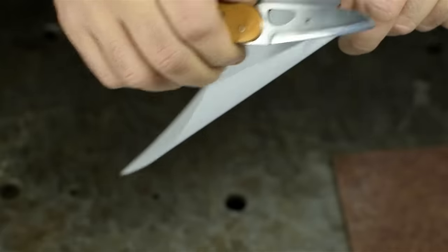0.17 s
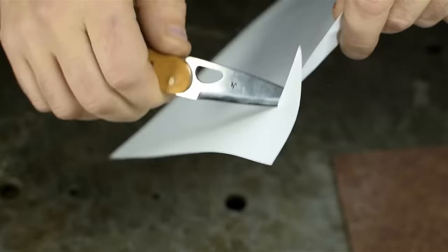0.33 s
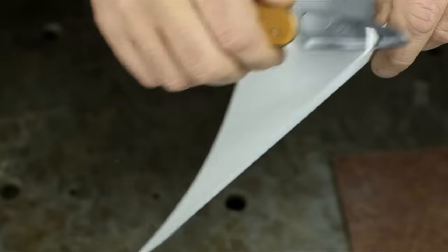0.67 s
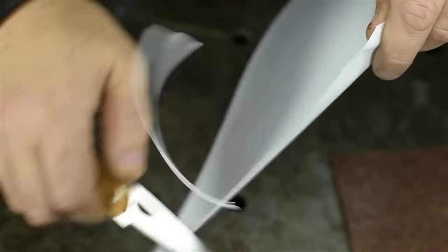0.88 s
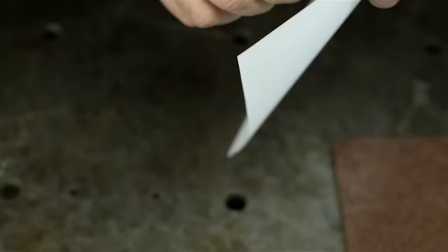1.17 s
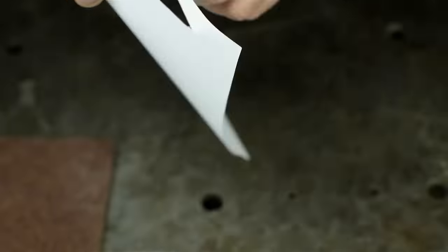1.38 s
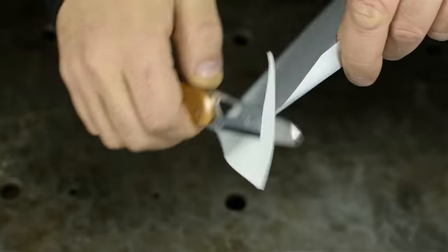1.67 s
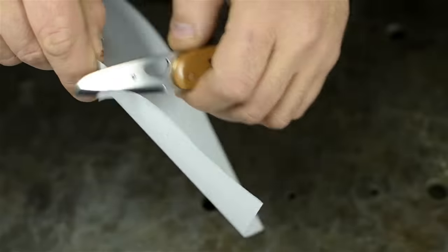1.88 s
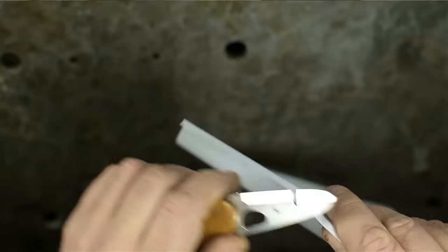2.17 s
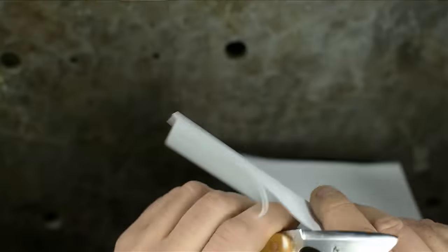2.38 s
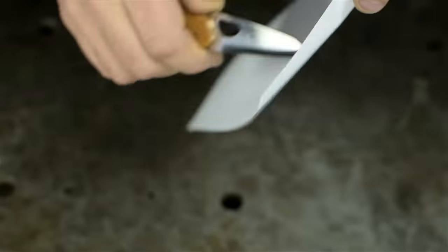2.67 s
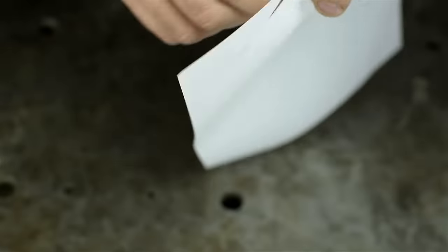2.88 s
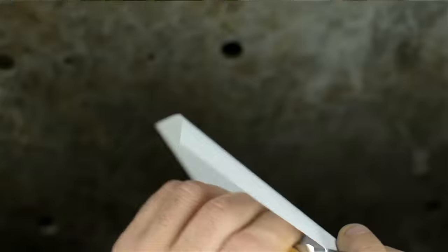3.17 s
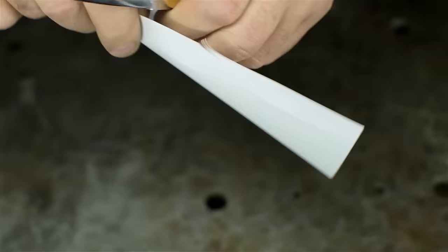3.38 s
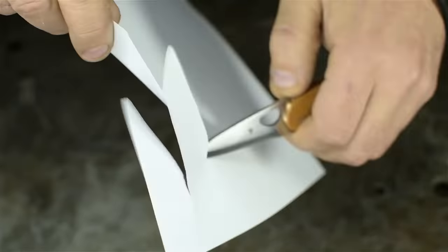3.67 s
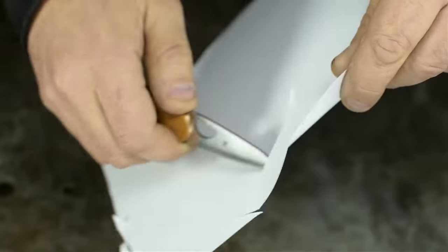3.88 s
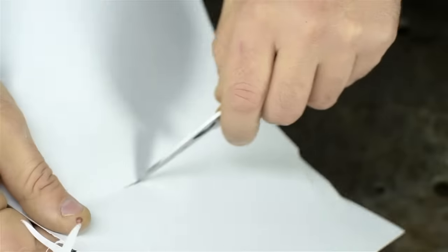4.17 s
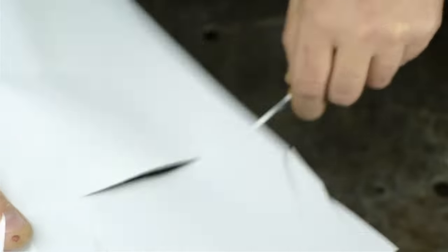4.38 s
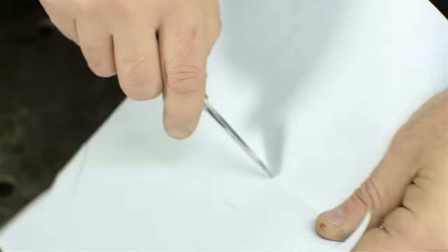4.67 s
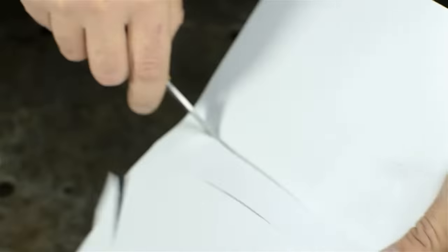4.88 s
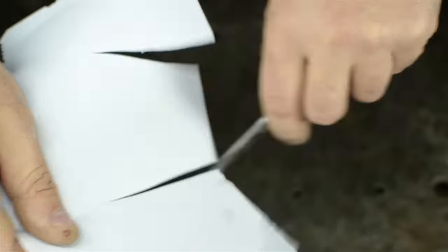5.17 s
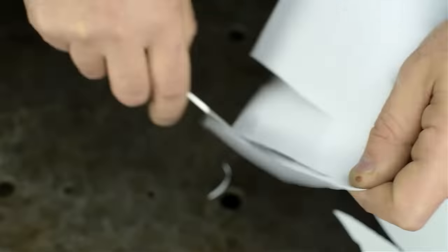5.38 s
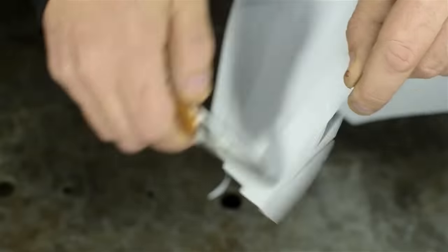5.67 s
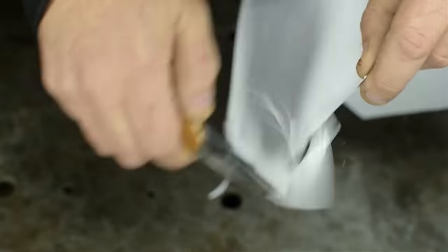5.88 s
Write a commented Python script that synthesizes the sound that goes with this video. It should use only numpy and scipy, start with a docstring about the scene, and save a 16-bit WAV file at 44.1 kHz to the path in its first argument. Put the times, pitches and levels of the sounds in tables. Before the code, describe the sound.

A sharp knife cuts a hand-held sheet of paper in quick, crisp, hissing strokes. A few longer slices come first, then a fast run of shavings and nicks, several slits through the sheet, and some tiny cuts at the end. The paper crackles, rustles and flexes between strokes, with an occasional slight squeak. The microphone is close, in a small, dry, quiet workshop.

```python
"""A sharp knife shaves strips off a hand-held sheet of paper and slits it, close up, over a workbench.
The edge snaps fibres in a dense, uneven stream; the sheet radiates them, coloured by how it is held.
The paper crackles as it buckles, a curling strip squeaks now and then, and the loose sheet drums.
A small, dry workshop answers faintly over quiet room tone."""
import sys
import numpy as np
from scipy import signal
from scipy.fft import rfft, irfft, next_fast_len
from scipy.io import wavfile
from scipy.ndimage import uniform_filter1d

SR = 44100
rng = np.random.default_rng(int(sys.argv[2]) if len(sys.argv) > 2 else 0)


def file_out(sig):
    """Save sig as 16-bit WAV at sys.argv[1]."""
    # one column per channel
    cols = np.atleast_2d(sig).T
    # limit, then scale
    lim = np.clip(cols, -1, 1)
    pcm = np.round(lim * 32767).astype(np.int16)
    wavfile.write(sys.argv[1], SR, pcm)


N = 266319
T = np.arange(N) / SR


def undb(db):
    """Decibels to gain."""
    return np.exp(np.asarray(db) * np.log(10) / 20)


def unit(x):
    """Scale to rms 1."""
    return x / np.sqrt(np.mean(x ** 2) + 1e-18)


def wander(n, rate_hz):
    """Random modulation with a spread near 1 that turns about rate_hz times a second."""
    place = np.arange(n) * np.clip(rate_hz, .1, 3000) / SR
    return 1.2 * np.interp(place, np.arange(2048), rng.standard_normal(2048))


def colour(x, curve):
    """EQ by a curve of (freq_hz, gain_db) points."""
    hz, db = np.transpose(curve)
    bins_hz = np.fft.rfftfreq(len(x), 1 / SR)
    gain = undb(np.interp(np.log(bins_hz + 1), np.log(hz), db))
    return irfft(rfft(x) * gain, len(x))


def band(x, hz, kind, order):
    """Butterworth filter."""
    return signal.sosfilt(signal.butter(order, np.clip(hz, 20, .48 * SR), kind, fs=SR, output="sos"), x)


def room_tone(level_db=-78):
    """The still air of the workshop: a faint, steady bed of noise."""
    # spectrum of the quiet room: freq_hz, gain_db
    air_colour = [(30,-28),(70,-22),(110,-9),(200,-0.5),(500,3.5),(1500,-3),(4000,-4.5),(8000,-14.5),(16000,-12)]
    return undb(level_db) * unit(colour(rng.standard_normal(N), air_colour))


def cracks(snap=7.6):
    """The paper buckles or slips off the edge: one sharp, broad snap and a brief shiver of the sheet."""
    # buckles and slips: start_s, peak_db, centre_hz, t60_s
    buckles = [(0.034,-59,1490,0.037),(0.115,-62,4000,0.044),(0.3064,-20.5,2730,0.005),(0.393,-37.5,5000,0.027),(0.454,-43,4000,0.027),(0.508,-25,1290,0.015),(0.5427,-19.5,1990,0.015),(0.562,-24,3000,0.011),
               (0.939,-24.5,1790,0.013),(1.193,-22,4500,.01),(1.264,-23,2090,0.017),(1.6015,-22,4770,0.011),(1.782,-21.5,2820,0.027),(1.8664,-18.5,2280,0.013),(2.135,-23,2530,0.011),
               (2.1635,-26,3000,0.0093),(2.722,-23.5,4500,.025),(2.883,-20.5,6070,0.026),(3.103,-28.5,3970,0.013),(3.411,-31,4000,.008),(3.418,-29,2540,.018),(3.561,-21.5,3940,0.015),
               (4.061,-37.5,4500,0.031),(4.163,-27.5,3040,0.017),(4.41,-29.5,3470,0.03),(4.449,-38.5,1970,0.01),
               (4.8318,-27,1300,0.011),(5.051,-39,1300,0.1),(5.071,-29.5,4420,0.0093),(5.423,-35,7000,0.0043),(5.448,-30.5,2700,0.0058),(5.552,-42,4560,0.033),(5.579,-28.5,6000,0.0099)]
    out, t = np.zeros(N), T[:SR // 25]
    for start_s, peak_db, centre_hz, t60_s in buckles:
        shiver = rng.standard_normal(len(t)) * undb(-60 * t / t60_s)
        shiver[0] += snap
        crack = band(shiver, [centre_hz / 2, centre_hz * 2], "band", order=1)
        crack = band(crack, 550, "high", order=3)
        i = int(start_s * SR)
        out[i:i + len(t)] += (undb(peak_db) * crack / np.abs(crack).max())[:N - i]
    return out


def fibres(n, snaps_per_s=9000, spread_db=4, rub=0.62, catch_db=-0.2, catch_hz=420):
    """Fibres snap at random over smooth rubbing; the edge catches and slips every few milliseconds."""
    snaps = (rng.random(n) < snaps_per_s / SR) * rng.choice([-1, 1], n)
    snaps = snaps * undb(spread_db * rng.standard_normal(n))
    rubbing = rub * rng.standard_normal(n)
    return (unit(snaps) + rubbing) * undb(catch_db * wander(n, catch_hz))


def crinkles(lightness, ticks_per_s=80, firm_db=11, light_db=21, spread_db=3):
    """Whole bundles of fibres give way in ticks, which stand out most under a light touch (lightness 1)."""
    n = len(lightness)
    scatter_db = spread_db * np.clip(rng.standard_normal(n), -2, 2)
    tick_db = firm_db + (light_db - firm_db) * lightness + scatter_db
    return (rng.random(n) < ticks_per_s / SR) * undb(tick_db)


def ringing(x, ring_db=-15, t60_s=0.06, top_hz=1100):
    """The sheet rings on briefly in countless modes, the low ones most."""
    t = T[:SR // 20]
    modes = band(rng.standard_normal(len(t)) * undb(-60 * t / t60_s), top_hz, "low", order=2)
    return x + undb(ring_db) * unit(signal.fftconvolve(x, modes)[:len(x)])


def steady(x, hold_s=0.0087):
    """The hand keeps up its pressure: level out swells that are slower than single catches."""
    return x / np.sqrt(uniform_filter1d(x ** 2, int(hold_s * SR)) + 1e-12)


def pressure_db(t, bite_s, draw_s, swell_db, touch_db=-22.5, bite_curve=1.09, release_db_per_s=2100):
    """Envelope of a cut: the edge sinks in, swells or fades as it is drawn through, and comes free."""
    bite = touch_db * np.clip(1 - t / bite_s, 0, 1) ** bite_curve
    draw = swell_db * (np.clip((t - bite_s) / draw_s, 0, 1) - .5)
    release = release_db_per_s * np.maximum(t - bite_s - draw_s, 0)
    return bite + draw - release


def stroke(row, sheet_colour, loosening, resonances=48, contact_s=0.0061, trim_db=-0.97,
           rustle_s=.2, rustle_db_per_s=224, rustle_dull_hz=5500):
    """One pass of the blade, then a rustle: snaps shake resonances that come and go as the sheet bends."""
    start_s, bite_s, draw_s, level_db, swell_db, flap_db, fizz_db, rustle_db = row
    flap_growth_db, fizz_growth_db, rustle_flap_db = loosening
    cut_s = bite_s + draw_s
    active = (T >= start_s) & (T < start_s + cut_s + rustle_s)
    t, n = T[active] - start_s, int(active.sum())
    along = np.clip(t / cut_s, 0, 1) - .5
    cut_db = level_db + pressure_db(t, bite_s, draw_s, swell_db)
    flap_db = flap_db + flap_growth_db * along
    fizz_db = fizz_db + fizz_growth_db * along
    settling = (t > cut_s) * undb(rustle_db - rustle_db_per_s * np.maximum(t - cut_s, 0))

    size = next_fast_len(n)
    lightness = np.pad(np.interp(cut_db, [-53, -40], [1, 0]), (0, size - n))
    snaps = ringing(fibres(size) + crinkles(lightness))
    spectrum = rfft(steady(colour(snaps, sheet_colour)))
    centres_hz = np.geomspace(240, 16000, resonances)
    band_index = np.interp(np.fft.rfftfreq(size, 1 / SR), centres_hz, np.arange(resonances))
    paper = 0
    for k, hz in enumerate(centres_hz):
        triangle = np.maximum(0, 1 - abs(band_index - k))
        resonance = irfft(spectrum * triangle, size)[:n]
        # lows need the broad sheet to flap; the top fizz comes from the edge alone
        broad = np.interp(np.log(hz), np.log([250, 500, 2000]), [.35, 1.155, 0])
        edge = np.interp(hz, [6500, 9500], [0, 1])
        cut = undb(cut_db + broad * flap_db + edge * fizz_db)
        rustle = settling * undb(broad * rustle_flap_db) / np.hypot(1, hz / rustle_dull_hz)
        sway_db = 2.9 * wander(n, rate_hz=32)
        flutter_db = 1.86 * wander(n, rate_hz=260)
        paper = paper + resonance * np.maximum(cut, rustle) * undb(sway_db + flutter_db)
    jerk_db = 1.53 * wander(n, rate_hz=110)
    attack = np.clip(t / contact_s, 0, 1) ** 2
    out = np.zeros(N)
    out[active] = paper * undb(trim_db + jerk_db) * attack
    return out


def cutting():
    """The knife works the sheet in five ways; each grip gives the paper its own colour."""
    # strokes: start_s, bite_s, draw_s, level_db, swell_db, flap_db, fizz_db, rustle_db
    slices = [(0.182, 0.087, 0.082, -36.5, 1.5, 2, -6, -53.5), (0.447, 0.031, 0.13, -39, 9, 0.5, -4, -52),
              (0.666, 0.09, 0.14, -35, 1.5, -0.5, -2, -53),
              (0.915, 0.022, 0.011, -43, -1.5, 17.5, -22, -67)]  # three long slices down the sheet's edge, then a short, dull flick of paper
    shaves = [(1.041, 0.098, 0.064, -35.5, 4.5, -0.5, 2.5, -53.5),
              (1.24, 0.073, 0.086, -37, -6, 6.5, -1.5, -54), (1.419, 0.019, 0.097, -37, 5.5, 7, -1.5, -55),
              (1.585, 0.086, 0.11, -41, -7.5, 3, 5, -50.5), (1.833, 0.11, 0.14, -33.5, 5.5, 7.5, 2.5, -48),
              (2.151, 0.014, 0.095, -38.5, -0.5, -6.5, 4.5, -58),
              (2.387, 0.039, 0.091, -36.5, -1, -16, 7, -58), (2.501, 0.021, 0.028, -30.5, -4, 3.5, 0, -52),
              (5.293, 0.05, 0.081, -35.5, -1, 11.5, 2.5, -56)]  # strips off the stiff, curved edge
    pares = [(3.167, 0.094, 0.054, -38, 1, -8, -1, -53), (3.292, 0.027, 0.065, -36, -6.0, 0, 1, -50.5),
             (3.461, 0.1, 0.18, -40.5, 2.5, 5, -2, -59), (3.765, 0.044, 0.229, -40, -3, -7, -1.5, -64)]  # thin slivers, with a light touch
    nicks = [(2.626, 0.053, 0.074, -43, -5, 7, -3.5, -49), (2.77, 0.067, 0.053, -40, -2, -3, 2, -60),
             (2.925, 0.048, 0.051, -44.0, -3.5, -21, 1, -64.5), (2.995, 0.035, 0.018, -36, 3, 7.0, 3, -38),
             (5.561, 0.044, 0.031, -43.5, -4.5, -10, 2.5, -54), (5.692, 0.027, 0.035, -40, -4.5, 1, 1, -56),
             (5.797, 0.023, 0.034, -41.5, -0.5, -10, 0.5, -61.5),
             (5.898, 0.014, 0.015, -44, 6, -14.0, -1.5, -57),
             (5.934, 0.009, 0.0073, -36.5, 0.5, 16, -6, -53)]  # short nicks close to the fingers
    slits = [(4.083, 0.014, 0.058, -57, 8, -41.5, 5, -75.0),
             (4.145, 0.027, 0.036, -34, 1, -14.5, 0.5, -48.5),
             (4.216, 0.017, 0.16, -37, -3.5, -4.5, 0, -49), (4.57, 0.079, 0.071, -43, 10, -5.5, 0, -53),
             (4.725, 0.021, 0.013, -33.0, -1.5, 5, 1, -42.5),
             (4.762, 0.023, 0.17, -37.5, -3, 0.5, 2.5, -55),
             (5.073, 0.034, 0.095, -34, -2.5, -5, -2.5, -54.5)]  # the point slits the middle of the sheet
    # colour of the sheet in each grip: freq_hz, gain_db
    slice_colour = [(130, -38.5), (250, -32.5), (769, -6), (1630, -3), (2370, 1), (3440, -5.5),
                    (4150, -0.5), (6160, -17.5), (6910, -7.5), (8040, -10), (9560, -2.5), (13300, -4),
                    (14500, -6), (16000, -16)]
    shave_colour = [(130, -53), (331, -31), (482, -30.5), (769, -21), (1020, -4.5), (1480, -2), (1790, 1),
                    (2600, 0), (3130, 4), (7290, -1), (9180, -17), (10700, -9), (13000, -9), (16000, -5)]
    pare_colour = [(130, -52), (364, -33), (482, -20.5), (638, -24), (769, -13), (1230, -0.5), (2150, -5.5),
                   (3440, 2), (5000, -4.5), (6160, 1), (9180, -13.5), (11100, -5), (13000, -7.5),
                   (16000, -5)]
    nick_colour = [(130, -65), (439, -34.5), (581, -41), (769, -29.5), (1020, -15), (1230, -15.5),
                   (1480, -6), (3130, -5.5), (5000, 1), (6160, -6), (9930, -2.5), (11800, -17.0),
                   (14500, -4.5), (16000, -11.5)]
    slit_colour = [(130, -56), (439, -28.5), (529, -34.5), (1020, -2.5), (1230, -1.5), (1480, -4),
                   (1960, -6), (2370, -10.5), (4150, -9.5), (6530, -3), (8800, -14), (11400, -9.5),
                   (13000, -11.5), (16000, -10)]
    # how the paper hangs through a stroke, by grip: flap_growth_db, fizz_growth_db, rustle_flap_db
    loosening = {"slice": (-2.5, 9.9, 17), "shave": (1.4, 4.7, 21), "pare": (3.3, 1.4, 19.3),
                 "nick": (7, 2.7, 15), "slit": (2.9, -.7, 7.6)}
    grips = [("slice", slices, slice_colour), ("shave", shaves, shave_colour),
             ("pare", pares, pare_colour), ("nick", nicks, nick_colour), ("slit", slits, slit_colour)]
    return sum(stroke(row, sheet, loosening[grip]) for grip, rows, sheet in grips for row in rows)


def squeaks(width=0.26, rough_db=3.5, rough_hz=600):
    """Uneven stick-slip feeds a resonance of the curling strip, which glides as the strip grows."""
    # a strip chatters on the blade: start_s, length_s, from_hz, to_hz, level_db
    chatters = [(0.266,0.07,983,788,-48.5),(0.358,0.041,866,817,-55),(0.752,0.13,4290,4030,-49),(0.826,0.058,12700,7530,-38),(1.738,0.046,2390,1450,-38),
                (2.027,0.025,3290,3460,-33.5),(3.514,0.043,2800,3540,-52),(3.807,0.044,2500,1805,-48),(4.086,0.075,5500,5480,-59.5),(5.096,0.067,6950,6150,-42),(5.713,0.0277,4600,5200,-44.5),(5.816,0.0243,4720,4300,-44),(5.907,0.024,4720,4640,-45)]
    out = np.zeros(N)
    for start_s, length_s, from_hz, to_hz, level_db in chatters:
        n, i = int(length_s * SR), int(start_s * SR)
        phase = 2 * np.pi * np.cumsum(np.geomspace(from_hz, to_hz, n)) / SR
        width_hz = width * from_hz
        ring = wander(n, width_hz) * np.cos(phase) + wander(n, width_hz) * np.sin(phase)
        roughness = undb(rough_db * wander(n, rough_hz))
        out[i:i + n] += undb(level_db) * unit(ring * roughness) * signal.windows.tukey(n)
    return out


def flexes(width=0.18, skirt_db=-17):
    """Jerks of the blade drum on the loose sheet, a broad hollow resonance."""
    # the free part of the sheet flexes: peak_s, length_s, centre_hz, level_db
    jerks = [(0.543,0.032,1080,-38.5),(0.895,0.037,660,-48),(1.351,0.045,2170,-38.5),(1.776,0.04,770,-51.5),(2.094,0.04,620,-52),
             (2.544,0.049,776,-54.5),(3.322,0.039,1080,-45),(3.692,0.092,625,-62),(4.273,0.046,1100,-43),(4.805,0.088,1200,-39),(5.14,.04,1070,-45),(5.393,0.082,617,-57.5)]
    out = np.zeros(N)
    for peak_s, length_s, centre_hz, level_db in jerks:
        n = int(length_s * SR)
        push = np.pad(steady(fibres(n)) * np.hanning(n), (0, SR // 20))
        hollow = unit(band(push, centre_hz * np.exp([-width, width]), "band", order=2))
        skirt = unit(band(push, [centre_hz / 2, centre_hz * 2], "band", order=2))
        drum = hollow + undb(skirt_db) * skirt
        i = int(peak_s * SR) - n // 2
        out[i:i + len(drum)] += undb(level_db) * drum / np.sqrt(2 * np.sum(drum ** 2) / n)
    return out


def workshop(x, wet_db=-21, t60_s=0.13, dull_hz=6000, predelay_s=0.011):
    """The bench and nearby walls add a short, dull tail."""
    t = T[:SR // 2]
    wash = band(rng.standard_normal(len(t)), dull_hz, "low", order=1)
    tail = wash * undb(-60 * t / t60_s) * (t > predelay_s)
    return x + undb(wet_db) * signal.fftconvolve(x, tail / np.linalg.norm(tail))[:N]


def scene():
    """Knife and paper in the workshop, over room tone, in mono."""
    air = room_tone()
    paper = cutting() + cracks() + flexes() + squeaks()
    return (workshop(paper) + air)[None]


def record(dry, low_cut_hz=95, top_hz=15900):
    """The microphone sheds the deep bass; the recorder cuts the top."""
    thin = band(dry, low_cut_hz, "high", order=2)
    return signal.sosfilt(signal.ellip(12, .1, 80, top_hz, fs=SR, output="sos"), thin)


dry = scene()
out = record(dry)
file_out(out)
```